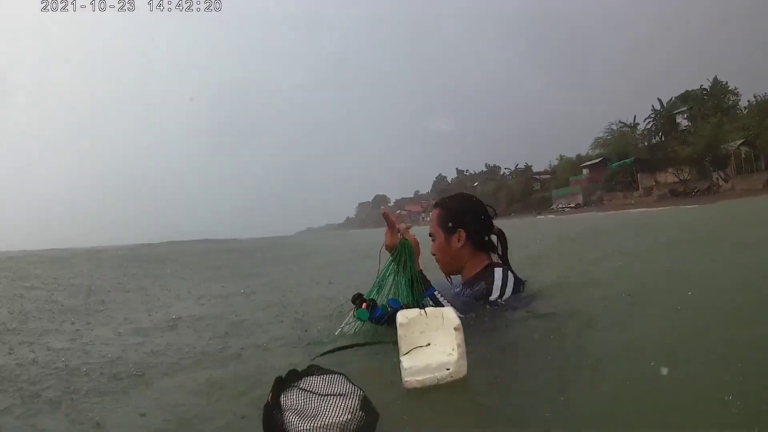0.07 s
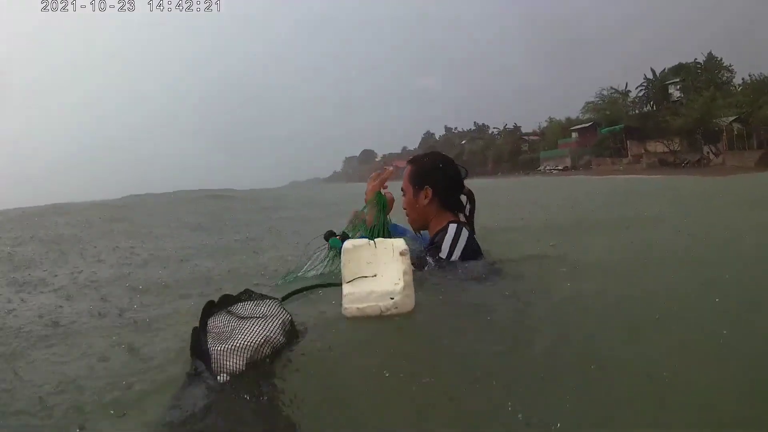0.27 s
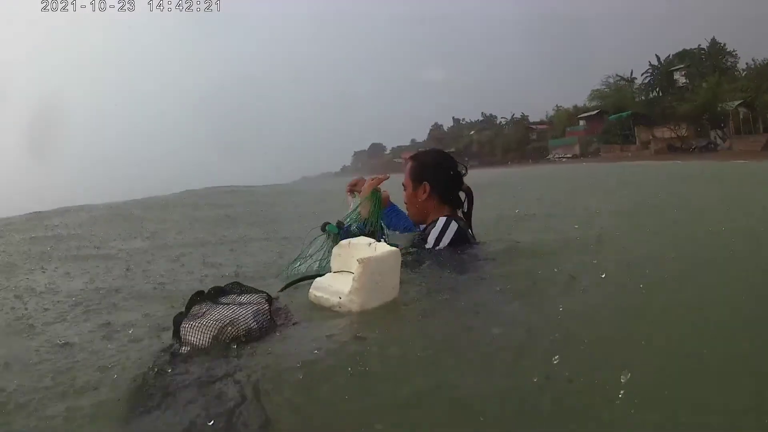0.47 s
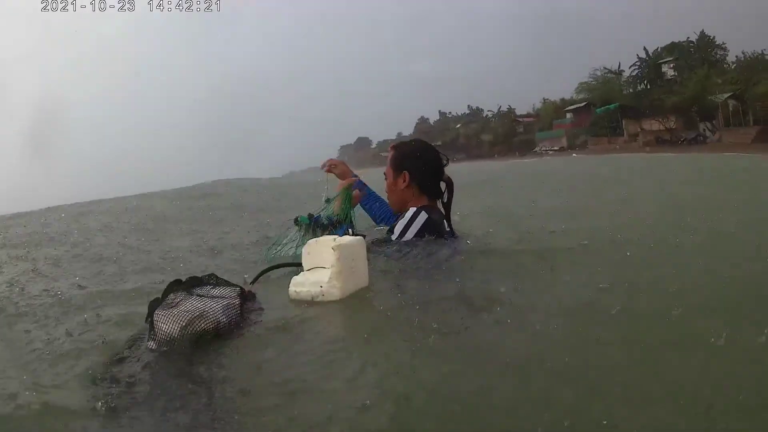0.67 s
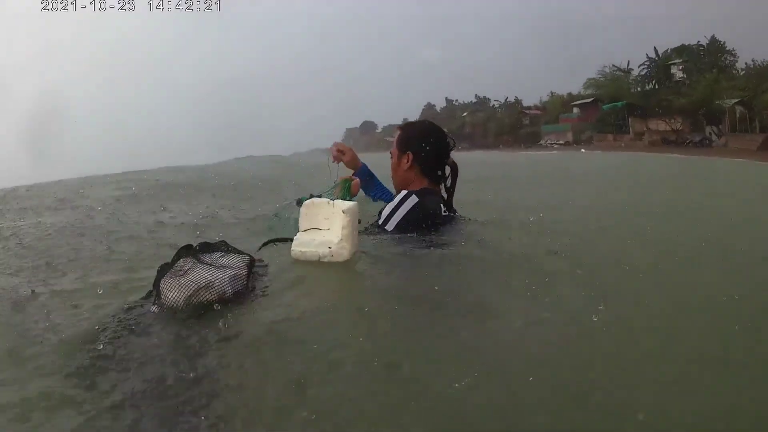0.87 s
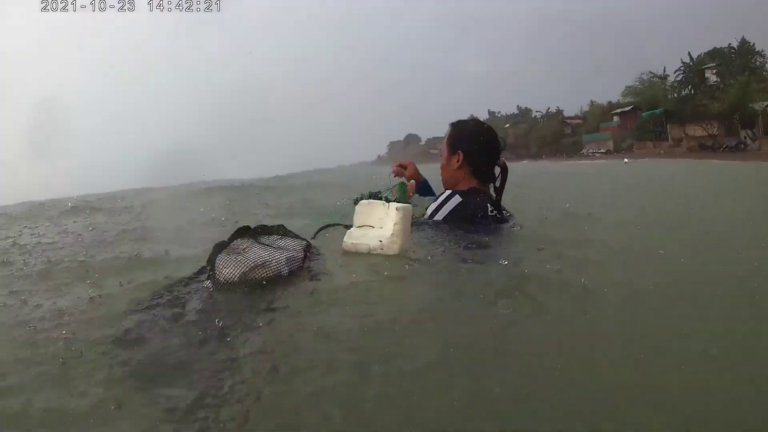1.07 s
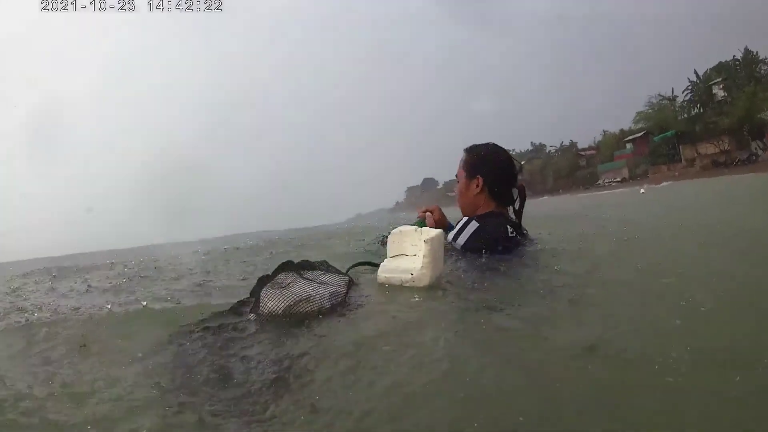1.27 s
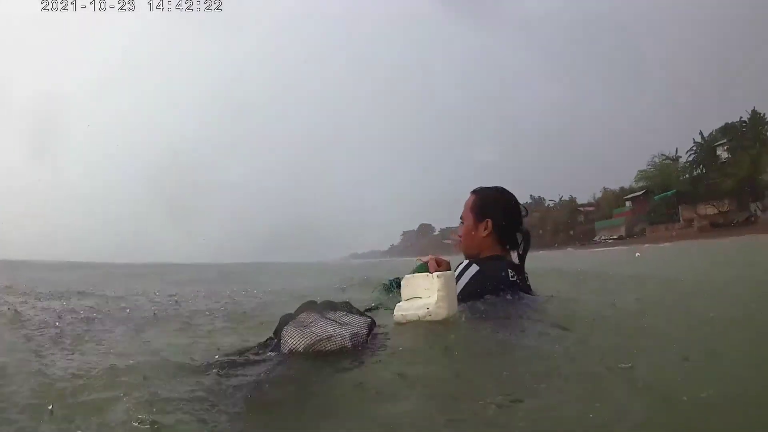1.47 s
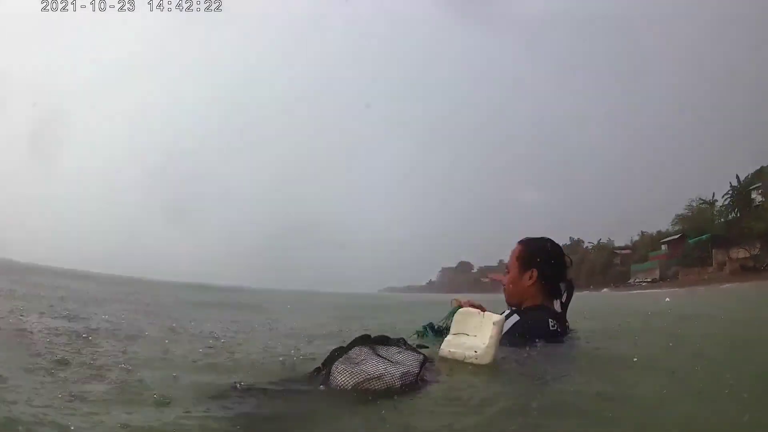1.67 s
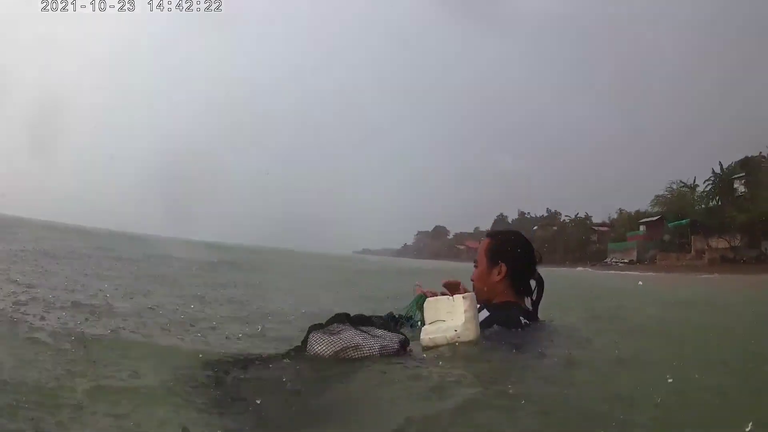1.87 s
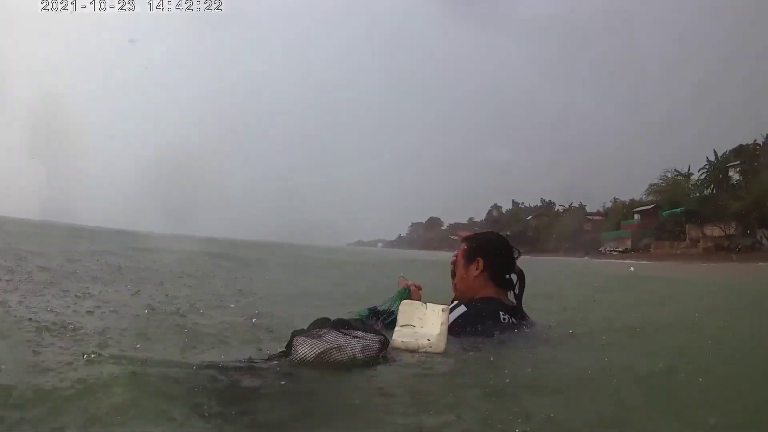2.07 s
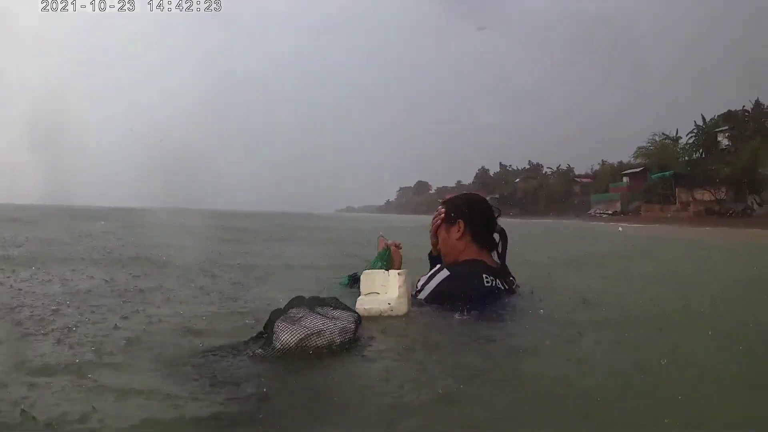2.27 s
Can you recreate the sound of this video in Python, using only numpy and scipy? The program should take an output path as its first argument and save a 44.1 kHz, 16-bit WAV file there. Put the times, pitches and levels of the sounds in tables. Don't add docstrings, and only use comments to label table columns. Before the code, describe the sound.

Scattered hard drops knock and tick on a sealed case, sparse at first, then denser and louder near the end, with the loudest crack clipping; soft water slaps and quiet open sea rain behind, dull and boxed-in.

```python
import sys
import numpy as np
from scipy import signal
from scipy.fft import rfft, irfft
from scipy.io import wavfile
from scipy.ndimage import uniform_filter1d

SR = 44100
rng = np.random.default_rng(int(sys.argv[2]) if len(sys.argv) > 2 else 0)


def unload_audio(sound):
    columns = np.transpose(np.atleast_2d(sound))
    steps = np.round(np.clip(columns, -1, 1) * 32767)
    wavfile.write(sys.argv[1], SR, steps.astype(np.int16))


def boost(x):
    u = np.asarray(x, float) / 20
    return 10 ** u


N = 101650

# (time [s], ring [Hz], ring level [dB], shell level [dB], bright
# level [dB])
STRONG_DROPS = [(0.021, 1210, -11, -12, -24), (0.0279, 1194, -7.5, -11, -21), (0.0798, 1090, -15, -18, -19),
                (0.0833, 766, -17, -9, -39), (0.3662, 1215, -7.5, -25, -55), (0.3768, 1400, -16.5, -17, -24),
                (0.576, 1030, -45, -13, -18), (0.5921, 1186, -8, -12.5, -23), (0.7149, 1860, -21, -14, -30),
                (0.9219, 1272, -11, -13, -24), (1.1948, 1390, -15, -17, -16), (1.2079, 2090, -4.5, -3, -7),
                (1.4966, 968, -4, -6, -15.5), (1.6347, 2043, -13, -14.5, -16), (1.6982, 1040, -13, -33, -37),
                (1.7265, 1266, -9.5, -30, -70), (1.792, 1200, -12, -20, -52), (1.8143, 2170, -11, -18, -20),
                (1.8449, 1180, -17, -12, -20), (1.854, 2030, -3, -3, -5.5), (1.8933, 2100, -12, -12, -22),
                (1.9764, 1578, -14, -10, -20.5), (2.1872, 1620, -9, -15, -17.5),
                (2.214, 1324, -11.5, -15, -31),
                (0.0681, 1740, -21, -24, -22), (0.3897, 1245, -16.5, -38, -36.5),
                (0.599, 1320, -30, -20.5, -45), (0.8194, 1342, -18, -22, -49),
                (1.1041, 1300, -26.5, -19.5, -27.5), (1.1344, 1080, -22, -33, -43),
                (1.1382, 947, -22, -26, -38), (1.1432, 1200, -17.5, -26, -29.5),
                (1.1494, 995, -25, -18, -39), (1.1621, 1920, -17, -14.5, -31),
                (1.2026, 1320, -13, -15, -41), (1.3327, 963, -16, -27, -50),
                (1.4279, 1355, -24, -25, -28.5), (1.4347, 1330, -15.5, -17, -41.5),
                (1.4636, 750, -24, -17, -25.5), (1.662, 1344, -19, -21.5, -15.5),
                (1.6908, 1010, -34.5, -17.5, -22), (1.755, 1370, -18.5, -17, -26.5),
                (1.8989, 1000, -46, -25.5, -27.5), (1.9543, 1284, -39, -17, -25.5),
                (2.0256, 1906, -15, -20.5, -23), (2.0396, 678, -20, -19, -32.5),
                (2.1884, 700, -17, -16, -38.5), (2.2212, 767, -22, -16.5, -26.5)]
# (time [s], ring level [dB], ring [Hz])
LIGHT_DROPS = [(0.05, -25, 1270), (0.138, -24, 1087), (0.269, -21, 1353), (0.729, -19, 1420),
               (0.812, -21.5, 1370), (0.97, -22, 1320), (1.01, -22, 1225), (1.09, -22.5, 1350),
               (1.295, -25, 983), (1.535, -19, 799), (1.63, -13, 930), (1.703, -17, 1330),
               (1.767, -19.5, 1340), (1.825, -13.5, 1190), (1.942, -21.5, 1044), (2.134, -22, 999),
               (2.242, -23, 1303), (.178, -33, 3350), (.2139, -29, 1610), (.3282, -28, 3350),
               (.6439, -26, 2080), (.6719, -26, 1590), (.7687, -29, 1790), (.8475, -27, 1520),
               (.951, -26, 1200), (.997, -26, 1300), (1.2471, -31, 1850), (1.5584, -24, 2010),
               (2.0787, -25, 1510), (2.112, -27, 1100), (2.2977, -22, 3080)]
# (time [s], pitch [Hz], level [dB], T60 [s])
BUBBLES = [(0.7124, 1303, -13.5, 0.032), (0.7149, 1933, -12.5, 0.028), (0.9217, 2004, -11, 0.015),
           (1.977, 1577, -8.5, 0.039), (1.8533, 3900, -3, .004), (1.8539, 1035, 6.5, .018),
           (1.977, 3120, -22, .03), (1.977, 4000, -32, .03), (1.9305, 1970, -24, .04),
           (.576, 3310, -17, .015), (.0792, 3240, -24, .015), (.3765, 4050, -24, .015)]
# (time [s], pitch [Hz], level [dB], T60 [s])
THUMPS = [(0.021, 161, -20, 0.023), (0.1, 161, -27.5, 0.018), (0.178, 60, -30, 0.12),
          (0.367, 177, -11.5, 0.027), (0.3902, 172.7, -21, 0.032), (0.515, 65, -33, 0.06),
          (0.5933, 319.7, -19.5, 0.059), (0.7153, 160.4, -20, 0.062), (0.812, 165, -27, 0.1),
          (.84, 45, -33, .08), (.885, 160, -28, .1), (.903, 40, -24, .08), (0.8704, 51, -22, 0.15),
          (0.9021, 160, -29, 0.15), (1.1042, 310, -22.5, 0.083), (1.1413, 134.5, -19.5, 0.045),
          (1.2075, 150, -19, 0.019), (1.3038, 64, -24, 0.05), (1.3333, 349, -21.5, 0.063),
          (1.4383, 154, -24.5, 0.026), (1.4954, 126.7, -6.5, 0.017), (1.522, 81.4, -26.5, 0.057),
          (1.657, 251, -33.5, 0.053), (1.7286, 314, -14.5, 0.055), (1.7415, 142.4, -20, 0.059),
          (1.8513, 114.7, -10, 0.043), (1.8758, 145, -26, 0.073), (1.9297, 69, -24, 0.15),
          (1.9776, 325, -19, 0.033), (2.0407, 124, -14, 0.045)]
# (pitch [Hz], level [dB], T60 [s])
SHELL_MODES = [(808, -13, .035), (1015.7, -6, 0.023), (1141, -13.5, 0.022), (1320, 0, 0.014),
               (1581, -13.5, 0.024), (1977, -7.5, .02), (2393, -13, 0.0095)]
BRIGHT_MODES = [(3107, -6.5, 0.027), (3285, 0, 0.022), (3610, -8, 0.015), (2720, -8, .012),
                (4050, -17, .01)]
CASE_MODES = [(71.3, -20, 0.12), (165.5, -2.5, 0.068), (260, -5.5, 0.025), (338, 1, 0.021)]
# (time [s], level [dB])
RAIN = [
    (0, -35),
    (0.242, -45),
    (0.702, -42),
    (1.27, -44),
    (1.8, -34.5),
    (2.3, -43),
]
# (frequency [Hz], density [dB per Hz])
WASH_COLOUR = [(15, -28), (25, 3), (580, -13), (1340, -6), (3250, -19), (4300, -28), (5590, -68)]
# (start [s], end [s], top [Hz], lone band kept above it [Hz], 0 for none)
DULLED = [(.1, .15, 2400, 2850), (.225, .29, 3600, 4100), (.29, .355, 2750, 3300), (.4, .425, 3000, 0),
          (.525, .555, 3200, 0), (.588, .612, 3700, 0), (.612, .63, 2500, 0), (.695, .712, 3700, 0),
          (.63, .66, 3700, 0), (.66, .695, 2600, 3450), (.755, .79, 2700, 3450), (.835, .9, 2800, 3400),
          (.945, 1.03, 3600, 0), (1.03, 1.078, 2100, 3450), (1.078, 1.155, 3850, 0),
          (1.24, 1.3, 1600, 1900), (1.3, 1.36, 2600, 3300), (1.36, 1.415, 2800, 0), (1.445, 1.48, 3700, 0),
          (1.53, 1.575, 2450, 3350), (1.575, 1.605, 2300, 0), (1.715, 1.735, 2200, 0),
          (1.735, 1.765, 3700, 0), (1.765, 1.8, 2500, 3200), (1.875, 1.91, 3500, 0),
          (1.91, 1.94, 1700, 2050), (2, 2.05, 3700, 0), (2.05, 2.068, 2600, 0), (2.068, 2.1, 2900, 3450),
          (2.1, 2.165, 2300, 3200), (2.245, 2.28, 2000, 0), (2.28, 2.293, 2600, 0)]

RING_RISE_S, RING_T60_S, RING_SAG = 0.001, 0.014, 0.03
CONTACT_S, WALL_HZ = 0.00052, 560
LIGHT_SHELL_DB, LIGHT_BRIGHT_DB = -5.5, -16.5
THUMP_RISE_CYCLES, CASE_DB = 0.2, -1.5
PATTER_PER_S, PATTER_SPREAD_DB = 260, 5
PATTER_SHELL_DB, PATTER_BRIGHT_DB, PATTER_CASE_DB = -1, -18.5, -1.5
WASH_DB, SLOSH_DB, FLICKER_DB = -41, 5, 2.5
HOP, GRIT_DB = 353, -23
BAND_HZ, HOLE_SHARE, HOLES_FROM_HZ = 175, 0.11, 2400
LONE_HZ, EDGE_S = 135, 0.003
TOP_HZ, EDGE_HZ = 4330, 15000
CLIP, HISS_DB = 0.975, -92


def drops():
    ring, shell, bright = np.zeros((3, N))
    light = [(s, hz, db - 7, db + LIGHT_SHELL_DB, db + LIGHT_BRIGHT_DB) for s, db, hz in LIGHT_DROPS]
    for s, hz, db, shell_db, bright_db in [*STRONG_DROPS, *light]:
        chance = rng.standard_normal((2, 300))
        add(ring, s, tone(hz, db, RING_RISE_S, RING_T60_S, RING_SAG))
        add(shell, s, splat(shell_db, chance[0]))
        add(bright, s, splat(bright_db, chance[1]))
    rattle = high(modes(shell, SHELL_MODES), WALL_HZ)
    tick = high(modes(bright, BRIGHT_MODES), 2500)
    return ring + rattle + tick


def splat(db, chance):
    t = np.arange(len(chance)) / SR
    push = chance * t * np.exp(-t / CONTACT_S)
    return boost(db) * push / np.sqrt(np.sum(push ** 2))


def tone(hz, db, rise_s, t60, sag):
    t = np.arange(int(t60 * SR) + 64) / SR
    env = (1 - np.exp(-(t / rise_s) ** 2)) * np.exp(-np.log(1000) * t / t60)
    bent_t = t + sag * 0.0039 * (1 - np.exp(-t / 0.0045))
    return -boost(db) * env / env.max() * np.sin(2 * np.pi * hz * bent_t)


def bubbles():
    out = np.zeros(N)
    for s, hz, db, t60 in BUBBLES:
        add(out, s, tone(hz, db, 0.0011, t60, -0.02))
    return out


def thumps():
    boom, push = np.zeros((2, N))
    for s, hz, db, t60 in THUMPS:
        add(boom, s, tone(hz, db, THUMP_RISE_CYCLES / hz, max(t60, 0.01), 0))
        add(push, s + 0.0018, boost(db + CASE_DB) * np.hanning(40) / 20)
    return high(boom + modes(push, CASE_MODES), 42)


def patter(rain_db):
    n = int(PATTER_PER_S * N / SR)
    parts = ((SHELL_MODES, PATTER_SHELL_DB), (BRIGHT_MODES, PATTER_BRIGHT_DB),
             (CASE_MODES, PATTER_CASE_DB))
    out = 0
    for table, db in parts:
        at = rng.integers(0, N, n)
        size = boost(PATTER_SPREAD_DB * np.minimum(rng.exponential(1, n), 2.4))
        ring = 0
        for mode in table:
            hits = np.zeros(N)
            hits[at] = size * rng.standard_normal(n)
            ring = ring + modes(hits, [mode])
        out = out + boost(db) * unit(high(ring, 0.42 * table[0][0]))
    return out * boost(rain_db)


def wash(rain_db):
    f = np.fft.rfftfreq(N, 1 / SR)
    hz_points, db_points = np.transpose(WASH_COLOUR)
    colour = boost(np.interp(np.log(f + 1), np.log(hz_points), db_points))
    out = 0
    for hz in 25 * 2.0 ** np.arange(8):
        band = colour * np.clip(1 - abs(np.log2((f + 1) / hz)), 0, 1) ** 0.5
        noise = irfft(rfft(rng.standard_normal(N)) * band, N)
        swell_db = SLOSH_DB if hz < 500 else FLICKER_DB
        out = out + noise * boost(swell_db * walk(14))
    return unit(out) * boost(WASH_DB + 0.5 * (rain_db - rain_db.mean()))


def walk(rate):
    k = int(SR / rate)
    steps = np.repeat(rng.standard_normal(N // k + 1), k)
    return unit(uniform_filter1d(uniform_filter1d(steps, k), k)[:N])


def modes(x, table):
    out = 0
    for hz, db, t60 in table:
        pole = np.exp(2j * np.pi * hz / SR - np.log(1000) / (max(t60, 0.004) * SR))
        out = out + boost(db) * signal.lfilter([1], [1, -pole], x).imag
    return out


def high(x, hz):
    return signal.sosfilt(signal.butter(2, hz, "high", fs=SR, output="sos"), x)


def low(x, hz):
    return signal.sosfiltfilt(signal.butter(8, hz, fs=SR, output="sos"), x)


def unit(x):
    return x / np.sqrt(np.mean(x ** 2))


def add(track, at_s, piece):
    i = int(at_s * SR)
    track[i:i + len(piece)] += piece[:N - i]


def scene():
    times, levels = np.transpose(RAIN)
    rain_db = np.interp(np.arange(N) / SR, times, levels)
    return (drops() + bubbles() + thumps() + patter(rain_db) + wash(rain_db))[None]


def patchy_treble(x):
    size = 4 * HOP
    window = np.sin(np.pi * (np.arange(size) + 0.5) / size) ** 2
    f, t, z = signal.stft(x, SR, window, size, 3 * HOP)
    around = np.sqrt(uniform_filter1d(abs(z) ** 2, size=11, axis=0))
    z = z + boost(GRIT_DB) * around * (rng.standard_normal(z.shape) + 1j * rng.standard_normal(z.shape))
    draw = rng.random((len(f), len(t)))
    draw = draw[(f / BAND_HZ).astype(int)][:, np.arange(len(t)) // 4]
    z[(draw < HOLE_SHARE) & (f[:, None] > HOLES_FROM_HZ)] = 0
    for start, end, top_hz, lone_hz in DULLED:
        kept = (f < top_hz) | (abs(f - lone_hz) < LONE_HZ)
        z[:, (t > start - EDGE_S) & (t < end + EDGE_S)] *= kept[:, None]
    z[f >= 4400] = 0
    return signal.istft(z, SR, window, size, 3 * HOP)[1][:N]


def low_pass(x):
    return signal.sosfilt(signal.butter(12, 15760, fs=SR, output="sos"), x)


def record(dry):
    x = low(patchy_treble(dry[0]), TOP_HZ)
    x = low(np.clip(x, -CLIP, CLIP), EDGE_HZ)
    mix = x[None] + boost(HISS_DB) * rng.standard_normal(N)
    return low_pass(mix)


dry = scene()
out = record(dry)
unload_audio(out)
```